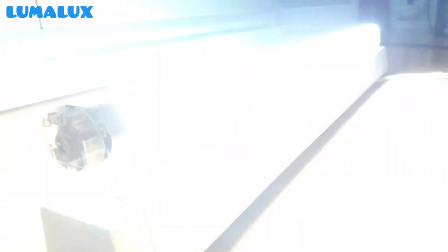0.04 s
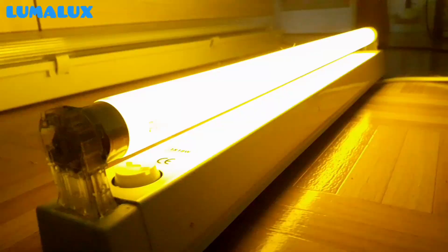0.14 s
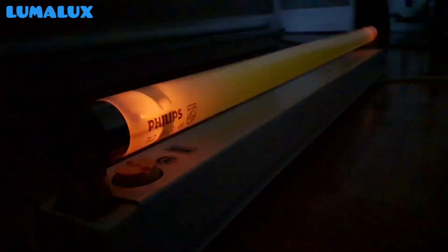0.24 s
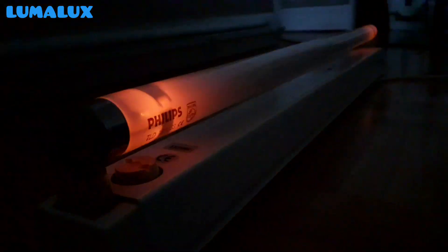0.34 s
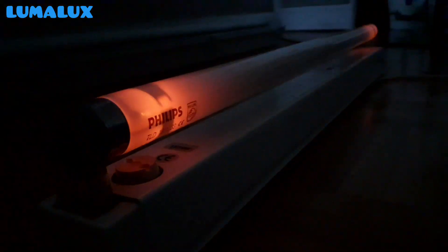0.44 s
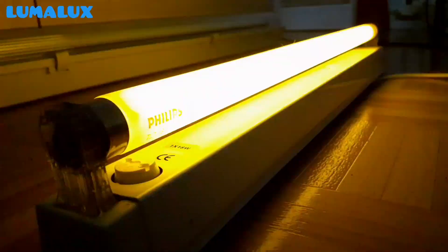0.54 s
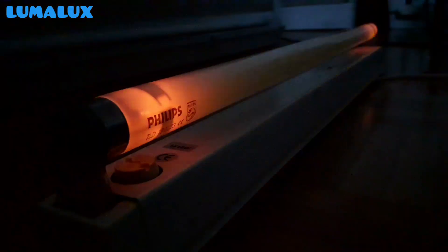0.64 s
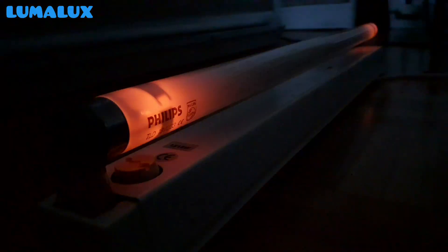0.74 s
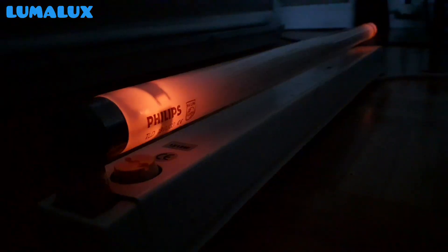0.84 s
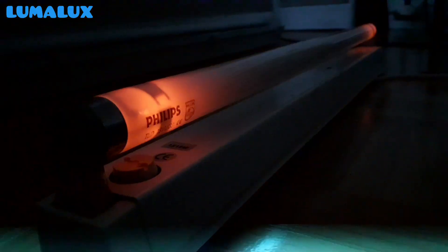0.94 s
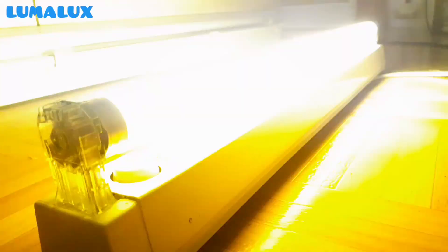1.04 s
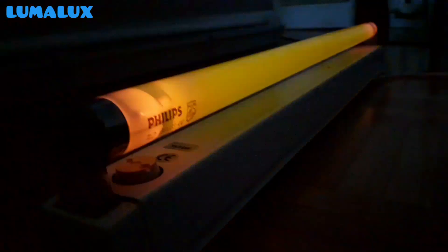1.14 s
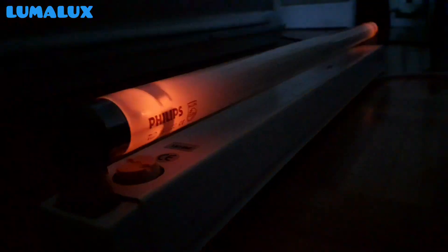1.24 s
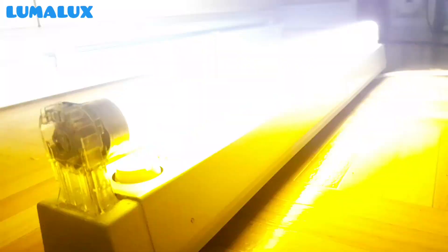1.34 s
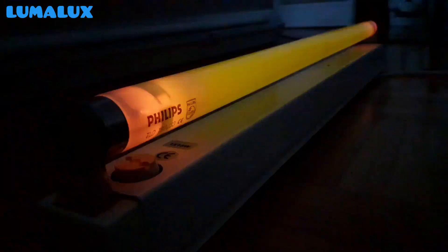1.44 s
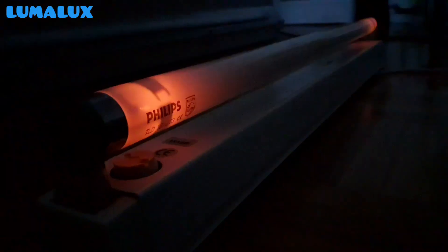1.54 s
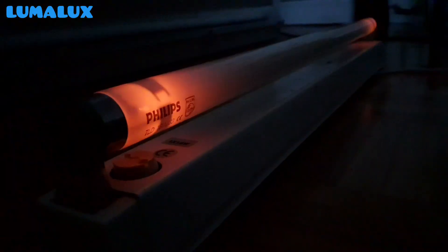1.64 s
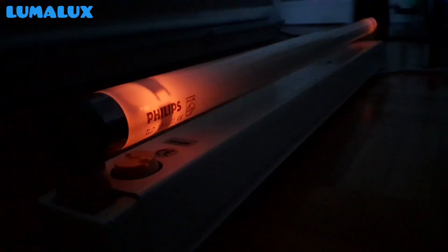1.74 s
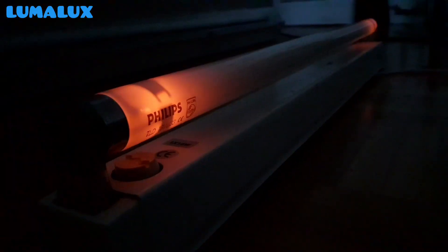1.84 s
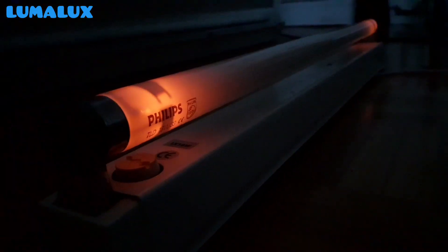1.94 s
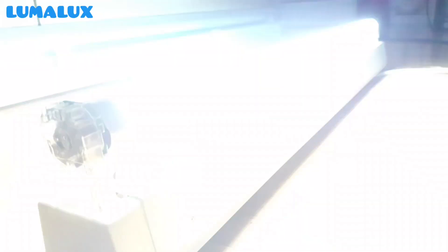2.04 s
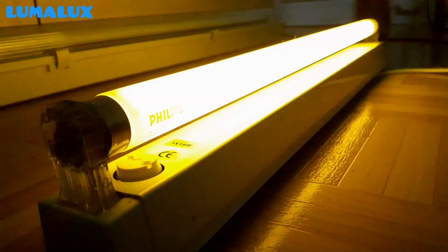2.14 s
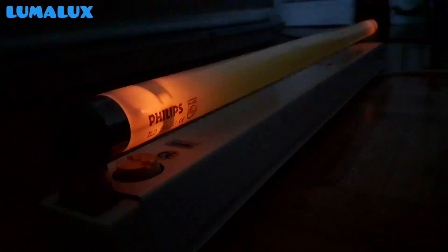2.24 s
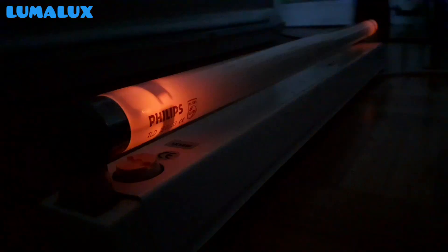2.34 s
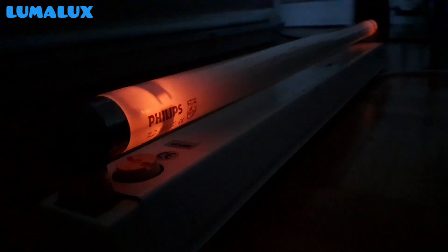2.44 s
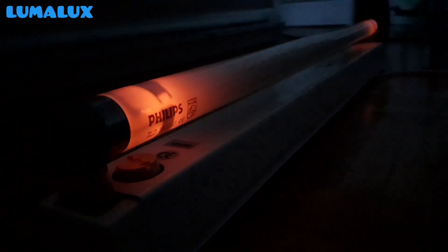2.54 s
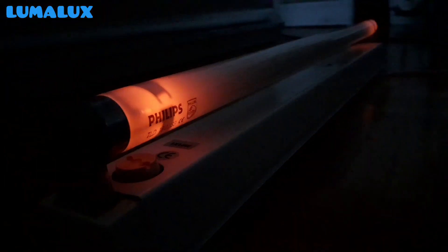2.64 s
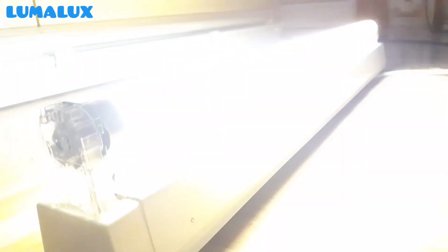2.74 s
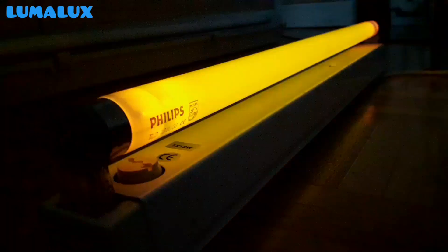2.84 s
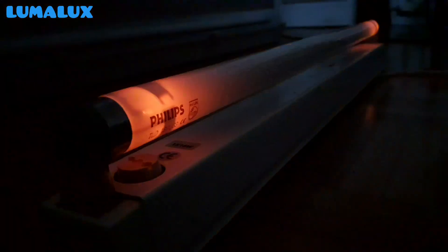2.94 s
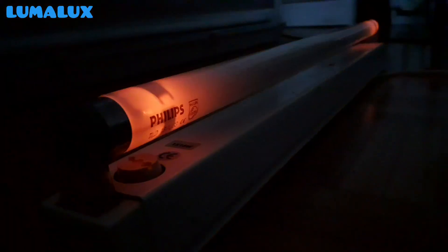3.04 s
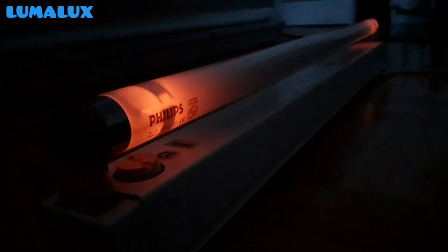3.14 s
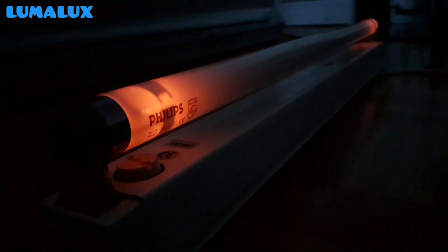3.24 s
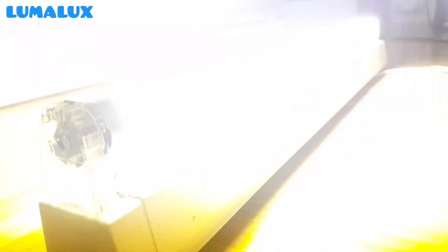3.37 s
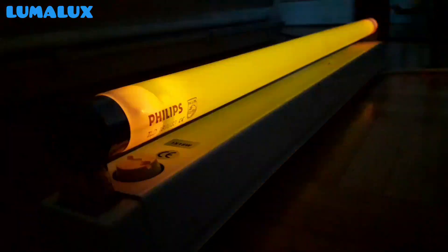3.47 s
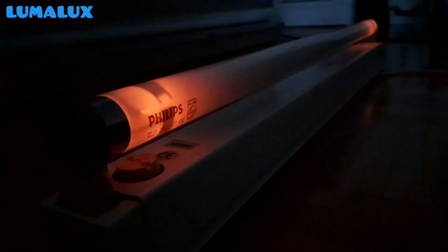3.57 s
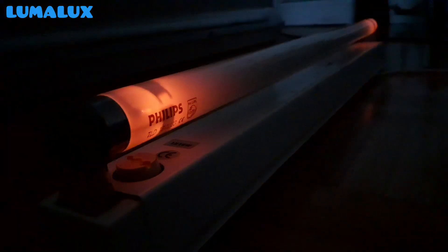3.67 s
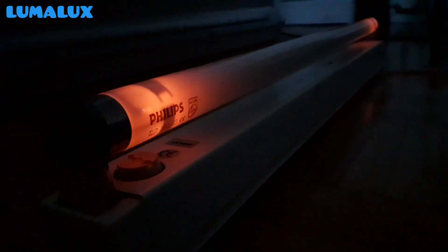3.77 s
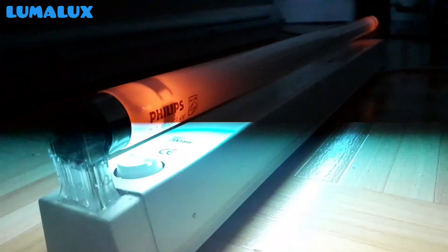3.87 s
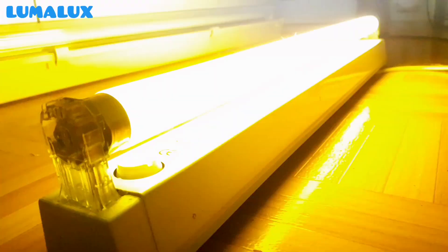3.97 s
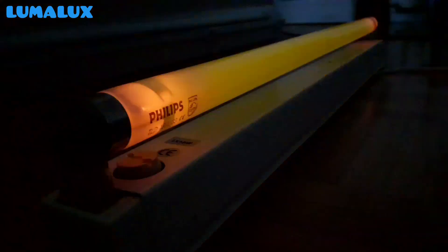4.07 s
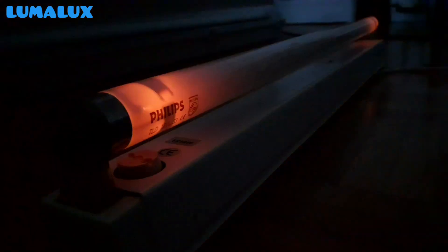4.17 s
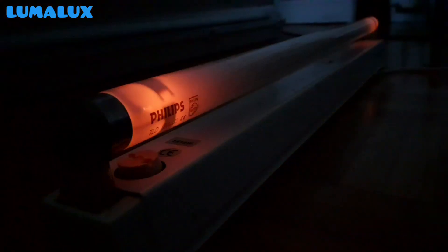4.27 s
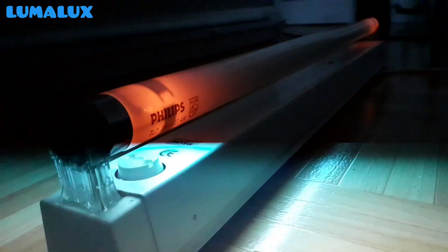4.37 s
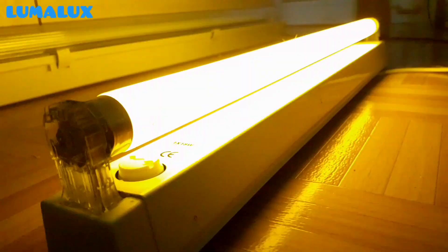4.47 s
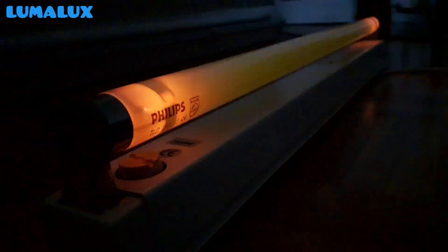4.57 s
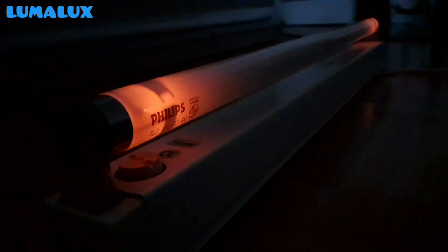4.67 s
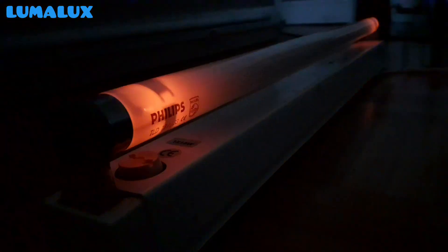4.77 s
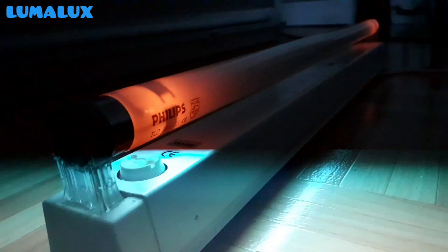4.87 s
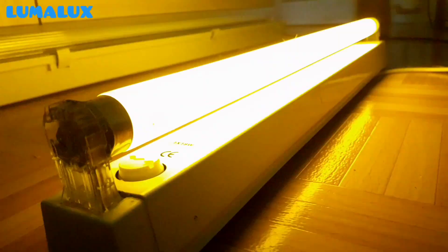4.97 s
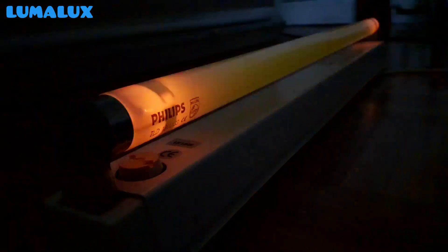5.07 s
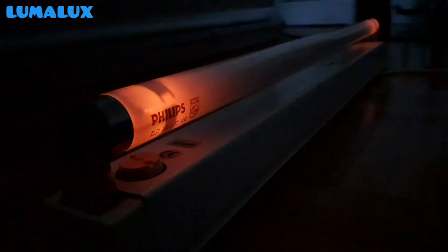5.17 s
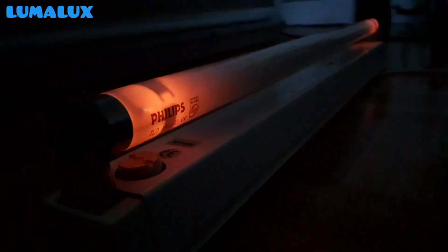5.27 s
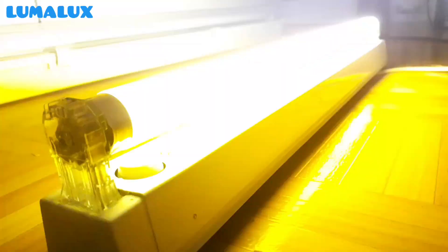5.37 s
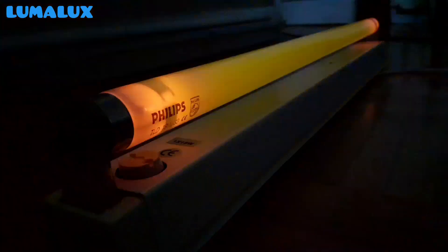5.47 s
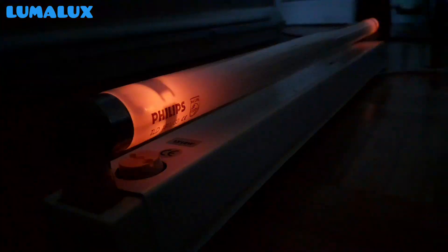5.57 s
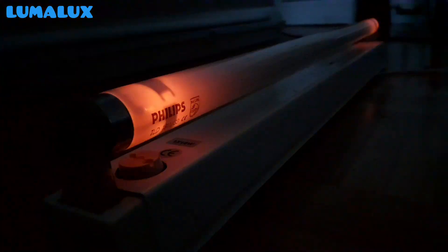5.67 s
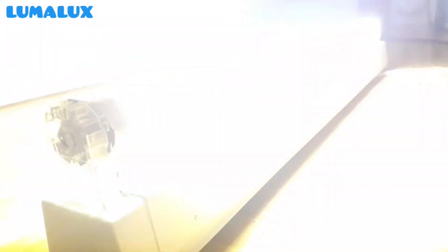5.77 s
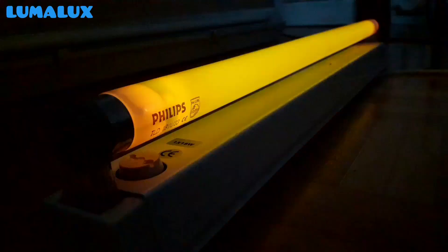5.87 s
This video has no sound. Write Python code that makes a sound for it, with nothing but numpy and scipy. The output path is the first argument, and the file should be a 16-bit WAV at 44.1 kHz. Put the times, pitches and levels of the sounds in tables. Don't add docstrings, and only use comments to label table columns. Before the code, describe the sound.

A worn fluorescent lamp tries and fails to start in a small, quiet room, heard closely in stereo. A steady electrical hum, strongest around 300 to 400 hertz, lies over soft room air and fine hiss. At about 0.05, 0.5, 1.0 and 1.35 seconds the starter snaps with a tinny click; the hum swells to a harsh buzz for under a tenth of a second while the thin steel fitting knocks rapidly, some knocks sharpened by a slapping cover. Each burst dies with a dull little thud, sometimes a faint high wiry ring. After a gap, another comes at 2.05, then the loudest clattering one at 2.7. More follow at 3.4, 3.9, 4.4, 4.9, 5.4 and 5.75, fairly regular, with short metallic ringing and a brief room tail. Barely audible, soft distant thuds occur between some bursts, the clearest near 4.5 seconds.

```python
import sys
import numpy as np
from scipy import signal
from scipy.fft import rfft, irfft
from scipy.io import wavfile

SR = 44100
rng = np.random.default_rng(int(sys.argv[2]) if len(sys.argv) > 2 else 0)


def file_out(sig):
    cols = np.atleast_2d(sig).T
    lim = np.clip(cols, -1, 1)
    pcm = np.round(lim * 32767).astype(np.int16)
    wavfile.write(sys.argv[1], SR, pcm)


def amplitude_ratio(level_db):
    exponent = np.asarray(level_db, float) / 20
    return 10 ** exponent


N = 260631
HUM_HZ = 99.952


def rms_one(x):
    return x / np.sqrt(np.mean(x ** 2) + 1e-20)


def at_hz(points, hz):
    points_hz, points_db = np.transpose(points)
    return np.interp(np.log(np.maximum(hz, 1)), np.log(points_hz), points_db)


def coloured(spectrum):
    hz = np.arange(N // 2 + 1) * SR / N
    white = rng.standard_normal((2, N))
    return rms_one(irfft(rfft(white) * amplitude_ratio(at_hz(spectrum, hz)), N))


def band(x, order, edges_hz, kind="band"):
    return signal.sosfilt(signal.butter(order, edges_hz, kind, fs=SR, output="sos"), x)


def shell_band(x):
    return band(x, 2, (1430, 2600))


def impulses(times, heights):
    train = np.full(N, 1e-18)
    train[np.round(np.asarray(times) * SR).astype(int)] += heights
    return train


def dying(train, t60):
    return signal.lfilter([1], [1, -amplitude_ratio(-60 / (t60 * SR))], train)


def two_ears(phasor, pan_db, lead):
    left = amplitude_ratio(pan_db / 2) * phasor.imag
    right = amplitude_ratio(-pan_db / 2) * (phasor * np.exp(-1j * lead)).imag
    return np.array([left, right])


def struck(modes, times, levels_db, chatter, spread_db, sense):
    ring_share = .75
    out = 0
    luck = rng.standard_normal((len(times), len(modes)))
    for k, (hz, level_db, t60, pan_db, lead) in enumerate(modes):
        force = impulses(times, amplitude_ratio(levels_db + spread_db * luck[:, k])) + chatter
        pole = amplitude_ratio(-60 / (ring_share * t60 * SR)) * np.exp(2j * np.pi * hz / SR)
        ringing = signal.lfilter([1], [1, -pole], force)
        out = out + sense ** k * amplitude_ratio(level_db) * two_ears(ringing, pan_db, lead)
    return out


# start in seconds, end in seconds, peak of the strike's jolt in dB,
# knock peak in dB, knock growth in dB per mains cycle.
FLASHES = [(0.055, 0.146, -38.5, -31.5, -1.5), (.506, 0.546, -31, -39.5, 6.5),
           (.997, 1.092, -40, -31, -0.5), (1.346, 1.391, -32.5, -42.5, -14),
           (2.054, 2.142, -40, -33.5, -0.5), (2.726, 2.814, -31, -36, 1.4), (3.368, 3.428, -32, -37, 4),
           (3.918, 3.993, -44, -32, -0.4), (4.418, 4.494, -40.5, -32, 0.7),
           (4.918, 4.992, -37, -31.5, -0.5), (5.367, 5.42, -32, -36.5, -2.5),
           (5.755, 5.824, -52, -31.5, -5.5)]


def arc(late_s=0, early_s=0):
    t = np.arange(N) / SR
    return sum(1.0 * (t > start + late_s) * (t < end - early_s) for start, end, *_ in FLASHES)


# time
# in seconds, peak in dB, relative level of the high channel modes in dB, relative brightness in dB.
SLAPS = [(.1331, -24.5, -5.5, -2.5), (1.0135, -25, -2, 2.5), (1.0546, -27, 3, -9), (1.077, -40, 2, 7),
         (1.3534, -38.5, 4, -26), (1.3744, -46.5, 6.5, 18), (2.1147, -45, -2, 5), (2.7568, -24, -1.5, 6),
         (2.7739, -23, -4, -8), (2.794, -35.5, 7.5, 8.5), (2.8255, -34.5, -2, 6.5), (3.4139, -33, 0.5, 3),
         (3.9748, -31, -3, 2), (4.4749, -30.5, 0.5, 6.5), (4.9753, -29.5, -20, 2),
         (5.3759, -27.5, -11, -10), (5.7955, -38.5, -6, 7.5), (5.816, -49.5, 8, 11)]
# low channel, high channel, crack and fizz in dB.
JOLT_MIX = (-13, -6, -23.5, -16)
KNOCK_MIX = (-4, -18.5, -13.5, -25)
SLAP_MIX = (-12.5, -7.5, -23, -21)
LET_GO_MIX = (-19, -40, -38)
LET_GO_S, LET_GO_DB = 0.00901, -39
FIRST_KNOCK_S = .0133
KNOCK_SCATTER_DB, KNOCK_JITTER_S = 0, .0006
HARD_JOLT_DB, JOLT_REACH = -31.5, 0.96
FIZZ_FOLLOWS = 1.3


def blows():
    mains_s = 2 / HUM_HZ
    cycles = FIRST_KNOCK_S + np.arange(int(N / SR / mains_s)) * mains_s
    luck = rng.standard_normal((len(cycles), 2))
    rows = []
    for start, end, jolt_db, knock_db, growth_db in FLASHES:
        jolt = jolt_db + np.array(JOLT_MIX)
        jolt[1] += JOLT_REACH * min(jolt_db - HARD_JOLT_DB, 0)
        rows.append((start, jolt_db, *jolt))
        rows.append((end + LET_GO_S, LET_GO_DB - 25, LET_GO_DB, *(LET_GO_DB + np.array(LET_GO_MIX))))
        burning = np.flatnonzero((cycles > start + .003) & (cycles < end))
        for k, i in enumerate(burning):
            db = knock_db + growth_db * k + KNOCK_SCATTER_DB * luck[i, 0]
            rows.append((cycles[i] + KNOCK_JITTER_S * luck[i, 1], db, *(db + np.array(KNOCK_MIX))))
    for s, db, high_db, bright_db in SLAPS:
        character = np.array([0, high_db, bright_db, FIZZ_FOLLOWS * bright_db])
        rows.append((s, db, *(db + np.array(SLAP_MIX) + character)))
    return np.transpose(rows)


def laminations():
    sizes = amplitude_ratio(6.04 * np.minimum(rng.exponential(1, N), 4)) * rng.choice([-1, 1], N)
    return amplitude_ratio(-66.5) * arc() * sizes * (rng.random(N) < 900 / SR)


# frequency in Hz, level in dB, t60 in seconds,
# left-right difference in dB, left lead in rad.
CHANNEL_LOW = [(207, -15.5, 0.098, 0.5, 0.33), (258, -19.5, 0.2, 1, 0.26), (392.5, -9, 0.064, -5.5, 0.74),
               (441.9, -9.5, 0.52, 1, 0.61), (480, -7.5, 0.068, 13, 0.18), (550, -15.5, 0.46, -5.5, 1),
               (588, -11, 0.25, 4, 0.2), (623, -10, 0.28, 10, 0.27), (703.5, -12, 0.091, 4, 0.16)]
# frequency in Hz, level in dB, t60 in seconds,
# left-right difference in dB, left lead in rad.
CHANNEL_HIGH = [(767, -10, 0.21, 7, 1.4), (837, -2, 0.11, -11, 0.2), (873, -4, 0.15, -1, 0.98),
                (1009, 0, 0.12, 10, 0.96), (1074, -8.5, 0.17, -11, 0.46), (1159, -10, 0.061, -21, 3.14),
                (1297, -22.5, 0.23, 23, 0.6)]
# frequency in Hz, level in dB, t60 in seconds,
# left-right difference in dB, left lead in rad.
SHELL = [(1563, -17.5, 0.13, 18, 3.8), (1651, -4, 0.089, -0.5, 1.7), (1700, -17.5, 0.026, 9, 0),
         (1822, -0.1, 0.041, 3, -0.14), (1894, -5, 0.034, 16.5, 1), (2036, -6, 0.074, -14.5, -0.45),
         (2077, 1.5, 0.041, 0.5, 3), (2166, -7.5, 0.054, -2, 6.5), (2213, -4.5, 0.094, -11, -1.9),
         (2308, 3, 0.062, 10, 0.22), (2422, -9, 0.062, -26.5, -2.5)]
# frequency in Hz, level in dB per Hz.
CRACK = [(1590, -5), (2700, -4.5), (2910, 0.5), (3160, -8.5), (3720, 1.5), (4110, 3), (4450, -0.5),
         (5440, -7), (5950, -3), (6640, -2), (9500, -13), (12400, -16), (20900, -120)]
# frequency in Hz, level in dB per Hz.
FIZZ = [(5590, -54.5), (9500, -14), (11100, -10.5), (12500, -8), (12800, -6), (13600, -0.5), (16000, -4)]


def fitting():
    s, shell_db, low_db, high_db, crack_db, fizz_db = blows()
    chatter = laminations()
    low = struck(CHANNEL_LOW, s + 0.00061, low_db - 2.0, amplitude_ratio(-1) * chatter, spread_db=3.5, sense=-0.99)
    high = struck(CHANNEL_HIGH, s + 0.00016, high_db - 2.5, amplitude_ratio(-6) * chatter, spread_db=3.5, sense=-0.95)
    channel = band(low + high, 4, [192, 1700])
    shell = shell_band(struck(SHELL, s, shell_db - 9.5, chatter, spread_db=4.5, sense=0.89))

    crack_train = impulses(s, amplitude_ratio(crack_db - 7.0))
    crack_decay = dying(crack_train, 0.0088) + amplitude_ratio(1.0) * dying(crack_train, 0.11)
    crack = coloured(CRACK) * crack_decay * amplitude_ratio([[3], [-3]])
    fizz_train = impulses(s, amplitude_ratio(fizz_db))
    fizz_decay = dying(fizz_train, 0.017) + amplitude_ratio(-9.5) * dying(fizz_train, 0.19)
    fizz = coloured(FIZZ) * fizz_decay * amplitude_ratio([[3], [-10]])
    return channel + shell + crack + fizz


# time in seconds, can peak in dB, glass bulb ping in dB,
# ring time in seconds until the strip damps it.
SNAPS = [(.056, -38.5, -67, 0.053), (.135, -51, -64, .02), (.506, -49, -46, 0.034), (.997, -46, -70, 0.014),
         (1.055, -59, -60, 0.051), (1.347, -44, -50, 0.059), (2.055, -38, -50, 0.046),
         (2.727, -33, -42, 0.019), (2.826, -48, -48, 0.0096), (3.366, -42.5, -47.5, 0.082),
         (3.917, -38, -59, 0.05), (4.419, -40, -61, 0.034), (4.467, -41, -48, 0.015),
         (4.916, -46, -63, 0.058), (5.366, -43, -45.5, 0.013), (5.758, -44, -59, 0.055),
         (5.816, -59, -51, 0.086)]
# frequency in Hz, level in dB, t60 in seconds,
# left-right difference in dB, left lead in rad.
CAN = [(1620, -1, .08, 3, 1.6), (2250, -5, .07, 4, -1.2), (7540, -29, .12, 5, .5),
       (14100, -19, .04, 12, .4)]
# time in seconds, peak in dB.
BOUNCES = [
    (2.059, -46.5),
]
# frequency in Hz, level in dB, t60 in seconds,
# left-right difference in dB, left lead in rad.
CONTACT = [(3150, -1, 0.012, 21.5, 0.44), (4000, -4, 0.014, 15, .5), (5600, -12, .008, 7, .5)]


def starter_can():
    s, can_db, _, _ = np.transpose(SNAPS)
    body = shell_band(struck(CAN[:2], s, can_db, 0, spread_db=2.5, sense=-0.5))
    top = struck(CAN[2:], s, can_db - 3, 0, spread_db=1.0, sense=-0.96)
    bounce = struck(CONTACT, *np.transpose(BOUNCES), 0, spread_db=5.0, sense=-0.8)
    return body + top + bounce


# time in seconds, frequency in Hz,
# level in dB, t60 in seconds.
TWANGS = [
    (1.09, 11000, -70, .2),
    (1.383, 5980, -61, .22),
    (1.383, 9380, -74, .15),
    (1.383, 12050, -68, .2),
    (2.155, 11000, -71, .2),
    (2.83, 11500, -68, .15),
    (3.99, 11000, -66, .4),
    (4.5, 11000, -71, .2),
    (5.0, 11000, -72, .25),
    (5.82, 12750, -65, .2),
]
# time in seconds, level in dB.
CREEPS = [
    (1.971, -77),
    (3.73, -83),
]


def starter_glass():
    t = np.arange(N) / SR
    bulb = 0
    for at, _, ping_db, ring_s in SNAPS:
        fall_db = 270 * (t - at) + 1600 * np.maximum(t - at - ring_s, 0)
        bulb = bulb + amplitude_ratio(ping_db - fall_db) * (t > at)
    ping = bulb * np.sin(2 * np.pi * 13210 * t)
    twang = 0
    for at, hz, db, t60 in TWANGS:
        decay = amplitude_ratio(db - 60 * np.abs(t - at) / t60) * (t > at)
        twang = twang + decay * np.sin(2 * np.pi * hz * t)
    twang = amplitude_ratio(1.5) * twang * (.6 + .4 * np.cos(2 * np.pi * 31 * t))
    swell = sum(amplitude_ratio(db) * np.exp(-((t - at) / 0.02) ** 2) for at, db in CREEPS)
    creep = swell * coloured([(4500, -40), (6000, -9), (7200, -.5), (8200, -8), (9500, -51)])
    return (ping + twang) * amplitude_ratio([[.5], [-11]]) + creep


# multiple,
# amplitude in dB, left-right difference in dB, left lead in rad, phase in rad.
STRONG_HUM = [(4, -49, 4.0, .015, -.8), (3, -58.5, 7.2, .77, 1), (4.5, -85, 1, .3, 0)]
# relative extra drive in dB,
# lag in rad, mode offset in Hz, ring in seconds, early stop in seconds.
ARC_DRIVE = [(10.9, 2.0, -2, .07, .015), (9.6, -1.25, 4, .02, 0), (50.5, 1.65, -12, .065, .015)]
# multiple, relative amplitude in dB, left-right difference in dB, left lead in
FAINT_HUM = [(1.5, -84, 4, .2), (2, -80, 4, .4), (5, -68, 9, 2.05), (6, -76, 0, .65), (7, -80, 0, .7),
             (10, -78, -6, .8), (11, -86, 0, .8)]


def ballast():
    turn = 2 * np.pi * HUM_HZ * np.arange(N) / SR
    hum = 0
    for line, drive in zip(STRONG_HUM, ARC_DRIVE):
        multiple, level_db, pan_db, lead, phase = line
        extra_db, lag, offset_hz, ring_s, early_s = drive
        fade = np.exp(-1 / (ring_s * SR))
        pole = fade * np.exp(2j * np.pi * offset_hz / SR)
        current = arc(.01, early_s)
        extra = signal.lfilter([1 - fade], [1, -pole], current)
        swing = 1 + amplitude_ratio(extra_db) * np.exp(-1j * lag) * extra
        hum = hum + two_ears(amplitude_ratio(level_db) * swing * np.exp(1j * (multiple * turn + phase)), pan_db, lead)
    for multiple, level_db, pan_db, lead in FAINT_HUM:
        hum = hum + two_ears(amplitude_ratio(level_db + 4.5) * np.exp(1j * multiple * turn), pan_db, lead)
    return hum


def room(x):
    t60_s, wall_cut_hz, level_db = 0.28, 14300, -10.5
    t = np.arange(SR // 2) / SR
    bright = rng.standard_normal((2, len(t)))
    dull = band(bright, 2, wall_cut_hz, "low")
    tail = dull * amplitude_ratio(-60 * t / t60_s) * np.minimum(t / 0.00069, 1)
    tail = tail / np.sqrt(np.sum(tail ** 2, axis=1, keepdims=True))
    return amplitude_ratio(level_db) * signal.fftconvolve(x, tail, axes=1)[:, :N]


# frequency in Hz, level in dB per Hz.
ROOM_TONE = [(20, -27), (50, -15.5), (100, 0), (150, -6), (250, -1.5), (600, -4.5), (900, -4), (1100, -8),
             (1400, -17.5), (1900, -13), (2500, -28), (3000, -37.5)]
# time in seconds, level in dB.
THUDS = [
    (1.64, -65),
    (1.969, -73),
    (2.65, -66),
    (4.519, -56),
]
# frequency in Hz, level in dB per Hz.
HISS = [(2000, 1), (2600, -3.5), (3200, -3), (4000, 0), (5000, -5.5), (6500, -11.5), (8000, -12),
        (9300, -32), (10500, -5), (12500, 1), (14000, 0), (15700, 1)]


def room_tone():
    t = np.arange(N) / SR
    mid, side = coloured(ROOM_TONE)
    air = amplitude_ratio(-67.5) * np.array([mid + 0.55 * side, mid - 1.2 * side]) * amplitude_ratio([[3.5], [-3]])
    swell = sum(amplitude_ratio(db) * np.exp(-((t - at) / 0.015) ** 2) for at, db in THUDS)
    rumble = coloured([(20, -16), (60, -13), (150, 2.0), (230, -1), (350, -58)])[0]
    thuds = swell * rumble * amplitude_ratio([[3], [-3]])
    hiss = amplitude_ratio(-67) * coloured(HISS) * amplitude_ratio([[.8], [-.8]])
    return air + thuds + hiss


def scene():
    knocks = fitting()
    knocks = knocks + room(knocks) + starter_can()
    dipped = band(knocks, 2, (8700, 10300), "bandstop")
    return .4 * dipped + .6 * knocks + starter_glass() + ballast() + room_tone()


def band_limit(x):
    return signal.sosfilt(signal.butter(12, 16470, fs=SR, output="sos"), x)


def record(dry):
    top_hz = 16050
    mix = signal.sosfilt(signal.ellip(10, .5, 60, top_hz - 250, fs=SR, output="sos"), dry)
    return band_limit(mix)


dry = scene()
out = record(dry)
file_out(out)
```